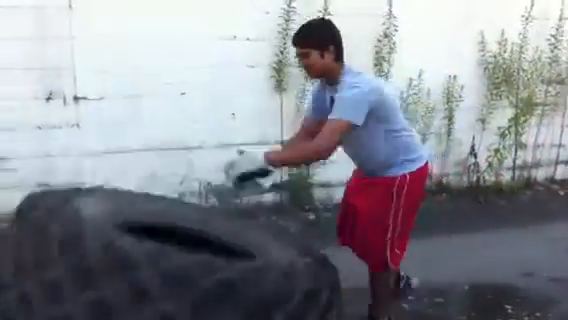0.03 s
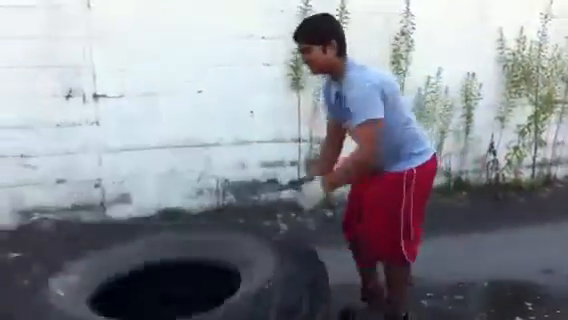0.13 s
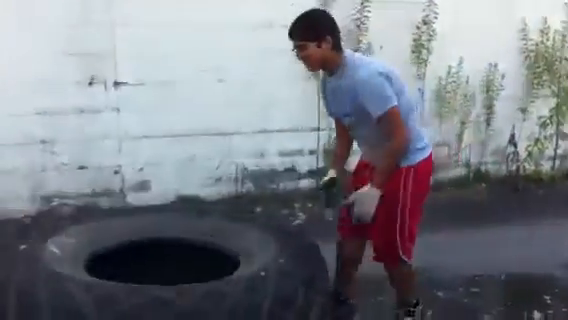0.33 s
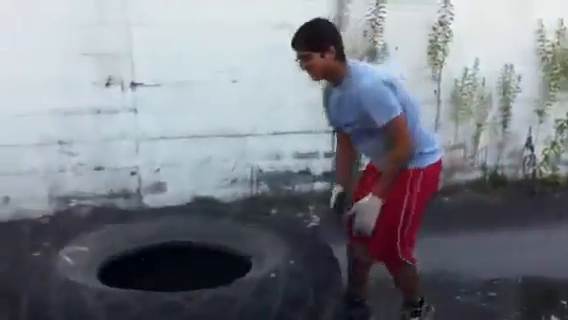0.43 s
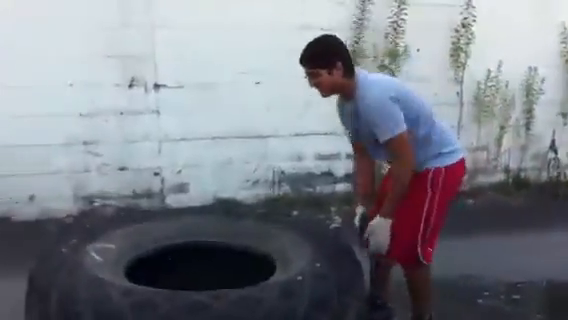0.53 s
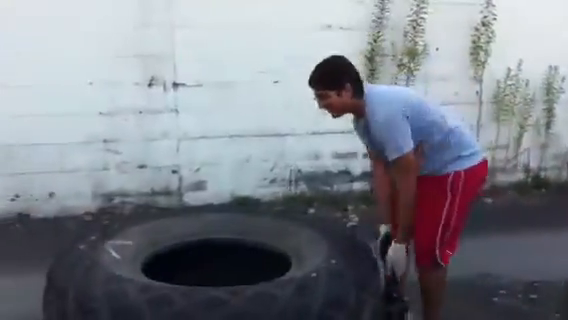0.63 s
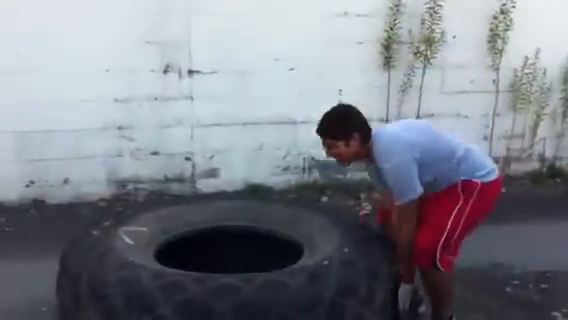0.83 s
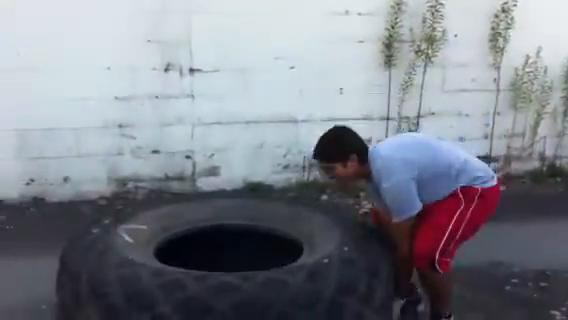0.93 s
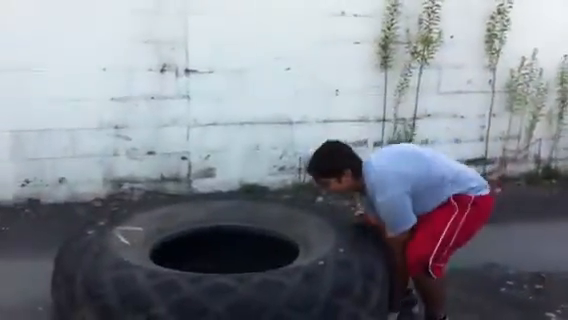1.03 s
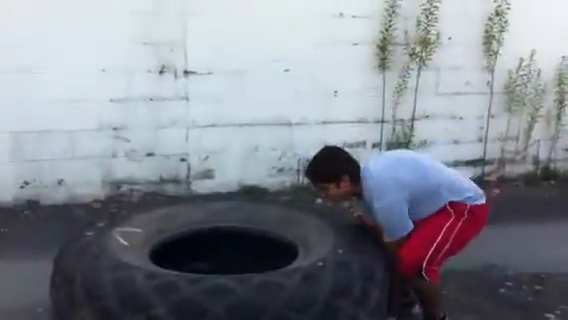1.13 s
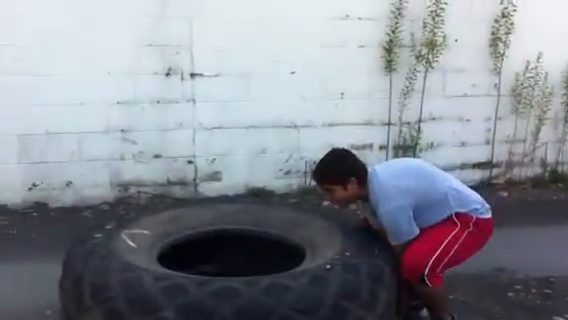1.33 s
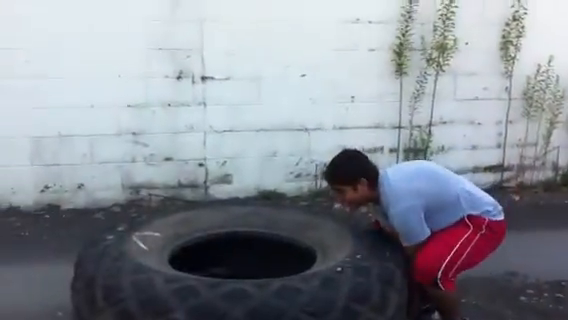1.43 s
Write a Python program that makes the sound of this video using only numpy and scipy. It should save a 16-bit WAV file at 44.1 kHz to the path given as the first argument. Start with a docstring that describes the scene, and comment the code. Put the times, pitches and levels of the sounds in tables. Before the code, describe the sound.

Hard slap and thud of a big tire falling on pavement, with a weaker rebound.

```python
"""A hard slap and thud over town noise: a heavy tractor tire falls flat on pavement in a walled yard,
rebounds and lands again softly. The tread slaps, the carcass thuds, the hollow rings, and the air
pushed out sprays grit; the walls throw it all back. Shoes and gloves then scuff faintly, and a few
small stones crack underfoot."""
import sys
import numpy as np
from scipy import signal
from scipy.fft import rfft, irfft
from scipy.io import wavfile
from scipy.ndimage import uniform_filter1d

SR = 44100
rng = np.random.default_rng(int(sys.argv[2]) if len(sys.argv) > 2 else 0)


def master_out(mix):
    """Clip the mix to full scale and print it as 16-bit PCM to the path in sys.argv[1]."""
    frames = np.transpose(np.atleast_2d(mix))
    ceiling = np.clip(frames, -1, 1)
    pcm = np.round(ceiling * 32767).astype(np.int16)
    wavfile.write(sys.argv[1], SR, pcm)


N = 66150
T = np.arange(N) / SR

# Tone of the town, the yard's tail, a scuff, a stone, sprayed grit, the tread's first crack, its slap
# and the whole mix. Each row: frequency in Hz, relative level in dB.
TOWN_TONE = [(25, -43), (60, -37), (90, -15.5), (130, -7.5), (168, 2), (200, -3), (350, -6), (550, -7.5),
             (1000, -12), (1600, -13), (2500, -17), (5000, -24.5), (7000, -28), (11000, -27.5),
             (14000, -33.5), (16000, -31)]
YARD_TONE = [(40, -22), (90, -12.5), (150, 2), (260, -17.5), (450, -8), (900, -8), (1500, -16.5),
             (4000, -27), (10000, -12.5), (16000, -25)]
SCUFF_TONE = [(80, -43), (300, -8), (900, -10.5), (1700, -1.5), (3000, -4.5), (6000, -12), (8500, -3.5),
              (11500, -1), (14000, -10), (16000, -27)]
STONE_TONE = [(80, -28.5), (400, -9), (1100, -9), (1800, -5), (3500, -15), (7000, -28), (15000, -32)]
GRIT_TONE = [(100, -33), (1500, 3), (4000, -3.5), (6000, -9), (8000, -2), (10500, 1.5), (13500, -3),
             (16000, -16)]
CRACK_TONE = [(40, -29), (300, -3), (800, -4), (1200, -2.5), (2100, -1), (3200, -18), (5500, -35),
              (12000, -37), (16000, -46)]
SLAP_TONE = [(30, -25), (120, -13), (250, -3.5), (480, -0.5), (750, -9), (1000, -9), (1300, -7.5),
             (2300, -10), (3500, -16.5), (6000, -29), (15000, -14.5)]
TREBLE_ROLLOFF = [(20, 0), (12500, 0), (14000, 0.5), (15300, -6), (16000, -8)]
# Fader ride on the town bed. Each row: time in seconds, level in dB.
TOWN_FADER = [(0, -46), (0.23, -48), (0.35, -44.5), (0.65, -54), (0.95, -52), (1.2, -50), (1.5, -49)]
# Length of the yard's tail. Each row: frequency in Hz, t60 in seconds (floored at 0.02 in use).
YARD_DECAY = [(60, 1.7), (150, 0), (260, 0), (500, 0.69), (1500, 0.76), (3500, -0.12), (10000, 1),
              (16000, 0.5)]
# Slapback off the walls. Each row: delay in seconds, level in dB.
WALL_ECHOES = [(.068, -21.5), (.098, -23)]
# Stones cracking underfoot. Each row: start in seconds, level in dB.
STONE_CRACKS = [(0.657, -45), (0.779, -46), (0.7937, -38), (0.940, -56)]
# Scuffs of shoes and gloves, and sprays of grit. Each row: start in seconds, level in dB,
# attack and t60 in seconds, dulling in dB per kHz.
SCUFF_SWELLS = [(0.657, -51.5, 0.0077, 0.19, -0.5), (0.700, -49, 0.032, 0.31, 0.5),
                (0.752, -46, 0.019, 0.5, 0), (1.115, -56.5, 0.021, 0.15, 7)]
GRIT_SWELLS = [(0.241, -29, 0.0058, 0.1, 2.5), (0.250, -26.5, 0.032, 0.051, 0.4),
               (0.310, -35, 0.0034, 0.24, 0.2), (0.484, -45, 0.024, 0.26, 0)]
# Modes of the rubber carcass and of the air in its hollow. Each row: pitch in Hz, relative level in dB,
# t60 in seconds.
CARCASS_MODES = [(87.4, -24, 0.21), (254, -1, 0.055), (367, -11, 0.095), (437.7, -9, 0.13),
                 (510.9, -4.5, 0.073), (602, -11.5, 0.069)]
HOLLOW_MODES = [(150.5, -7, .8), (196, -12, .45), (264, -11, .28), (335, -8, .33), (442, -5, .42),
                (505, 5, .3), (815, -19, .5), (1066, -16, .4), (1148, -6, .35), (1278, -9, .32),
                (1361, -12, .3), (1451, -12, .33), (1640, -9, .28), (1797, -12, .28), (1912, -11, .28),
                (2377, -11, .2)]
# The tire's hits: first blow, far rim, rebound. Each row: start in seconds, slap level in dB, slap hold
# in seconds, thud level in dB, thud attack in seconds, ring level in dB, slap dulling in dB per kHz,
# mode dulling in dB per octave, air push level in dB.
TIRE_HITS = [(0.2420, -14.5, 0.014, -10, 0.017, -21.5, 1, 0, -26.5),
             (0.3076, -27.5, 0.0052, -19.5, 0.0022, -60, 4.5, 4.5, -18.5),
             (0.477, -33.5, 0.0068, -23, 0.0033, -57, 3, 4.5, -39)]


def amp(db):
    """Decibels to gain."""
    return 10 ** (np.asarray(db) / 20)


def unit_rms(x):
    """Scales to rms 1."""
    return x / np.sqrt(np.mean(x ** 2) + 1e-20)


def curve_at(points, hz):
    """Reads a table on a log-frequency axis."""
    freqs, values = np.transpose(points)
    return np.interp(np.log(hz + 1), np.log(freqs + 1), values)


def colour(x, tone, dull_db_per_khz=0):
    """EQs a steady signal and brings it to rms 1."""
    hz = np.fft.rfftfreq(N, 1 / SR)
    eq_db = curve_at(tone, hz) - dull_db_per_khz * hz / 1000
    return unit_rms(irfft(rfft(x) * amp(eq_db), N))


def decay(t, t60):
    """Falls 60 dB in t60 seconds."""
    return np.exp(-np.log(1000) * np.maximum(t, 0) / np.maximum(t60, 1e-3))


def envelope(start, attack, t60, hold=0):
    """Attack, hold and release, all in seconds."""
    t = T - start
    return np.clip(t / max(attack, 1e-4), 0, 1) * decay(t - attack - hold, t60)


def ring(modes, start, attack, dull_db_per_octave=0):
    """Struck, decaying sines; a soft blow wakes the modes above 256 Hz less."""
    sound = np.zeros(N)
    for hz, db, t60 in modes:
        gain = amp(db - dull_db_per_octave * max(np.log2(hz / 256), 0))
        sine = np.sin(2 * np.pi * (hz * (T - start) + rng.random()))
        sound += gain * envelope(start, attack, t60) * sine
    return sound


def town_bed():
    """Distant town noise, with patches of its spectrum drifting by about 1.5 dB."""
    bands = signal.stft(rng.standard_normal(N), nperseg=1024)[2]
    patches = uniform_filter1d(rng.standard_normal(bands.shape), size=10, axis=0)
    drift_db = 1.5 * unit_rms(uniform_filter1d(patches, size=7, axis=1))
    bed = signal.istft(bands * amp(drift_db), nperseg=1024)[1][:N]
    return colour(bed, TOWN_TONE) * amp(np.interp(T, *np.transpose(TOWN_FADER)))


def yard_reverb(send):
    """Wall echoes and a diffuse tail whose bands die at their own speed."""
    hz, t, bands = signal.stft(rng.standard_normal(N), SR, nperseg=512)
    t60 = np.maximum(curve_at(YARD_DECAY, hz), 0.02)[:, None]
    equal_energy = np.sqrt(2 * np.log(1000) / (t60 * SR))
    bands = bands * decay(t, t60) * amp(curve_at(YARD_TONE, hz))[:, None] * equal_energy
    fade_in = np.minimum(T / 0.036, 1)
    response = signal.istft(bands, SR, nperseg=512)[1][:N] * fade_in
    for delay, db in WALL_ECHOES:
        response[round(delay * SR)] += amp(db)
    return signal.fftconvolve(send, response)[:N]


def stones():
    """Small stones crack under a sole."""
    return sum(amp(db) * colour(rng.standard_normal(N), STONE_TONE) * envelope(start, 0.0004, t60=0.016)
               for start, db in STONE_CRACKS)


def grains(clicks_per_s=8300, spread_db=2):
    """Dense clicks of uneven size."""
    size = amp(spread_db * np.minimum(rng.exponential(1, N), 4))
    return size * rng.standard_normal(N) * (rng.random(N) < clicks_per_s / SR)


def grit(swells, tone):
    """Sand, sprayed or scuffed, skitters over the pavement in short swells."""
    return sum(amp(db) * colour(grains(), tone, dulling) * envelope(start, attack, t60)
               for start, db, attack, t60, dulling in swells)


def tread_crack():
    """A hard clap of rubber as the first edge of tread meets the pavement."""
    noise = colour(rng.standard_normal(N), CRACK_TONE)
    return amp(-10.5) * noise * envelope(start=0.2424, attack=0.00053, t60=0.028, hold=0.002)


def tire_hit(start, slap_db, slap_hold, thud_db, thud_attack, ring_db, slap_dull, mode_dull, push_db):
    """Two stems: the blow (tread slap, air pushed out, carcass thud) and the ringing hollow."""
    noise = colour(rng.standard_normal(N), SLAP_TONE, slap_dull)
    slap = amp(slap_db) * noise * envelope(start, attack=0.0021, t60=0.15, hold=slap_hold)
    air_push = ring([(183.4, push_db, 0.048)], start, thud_attack)  # one short, low tone
    thud = amp(thud_db) * ring(CARCASS_MODES, start, thud_attack, mode_dull)
    hollow = amp(ring_db) * ring(HOLLOW_MODES, start, 0.0083, mode_dull)
    return np.array([slap + air_push + thud, hollow])


def scene():
    """Tire, grit and feet in the yard; the hollow opens upward and reaches the walls less."""
    blows, hollow = sum(tire_hit(*hit) for hit in TIRE_HITS)
    impact = tread_crack() + blows + grit(GRIT_SWELLS, GRIT_TONE)
    foley = grit(SCUFF_SWELLS, SCUFF_TONE) + stones()
    reverb = yard_reverb(impact + foley + amp(-9) * hollow)
    return (impact + foley + hollow + reverb + town_bed())[None]


def record(dry):
    """Soft clipping on the loudest peaks, a treble roll-off, then a steep high cut."""
    ceiling, high_cut_hz = 0.85, 15950
    clipped = ceiling * np.tanh(dry / ceiling)
    rolloff = amp(curve_at(TREBLE_ROLLOFF, np.fft.rfftfreq(N, 1 / SR)))
    softened = irfft(rfft(clipped) * rolloff, N)
    high_cut = signal.firwin(255, high_cut_hz, window=("kaiser", 9), fs=SR)
    return signal.oaconvolve(softened, high_cut[None], "same")


dry = scene()
out = record(dry)
master_out(out)
```